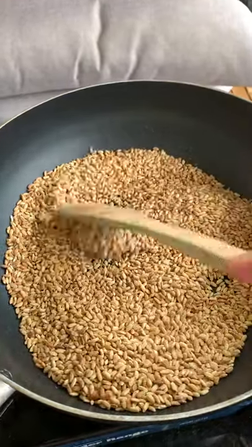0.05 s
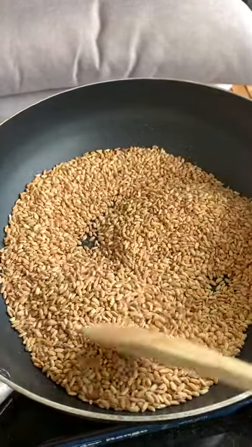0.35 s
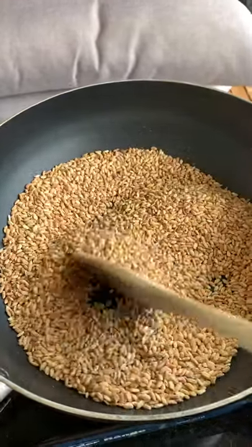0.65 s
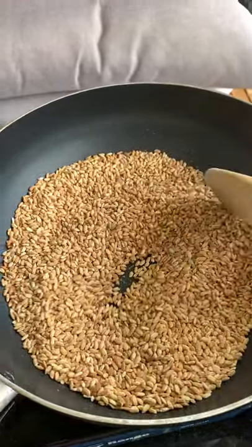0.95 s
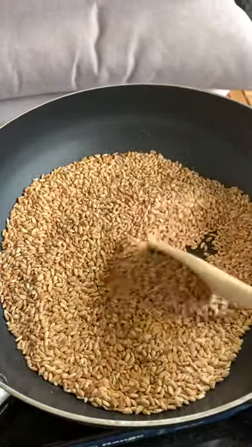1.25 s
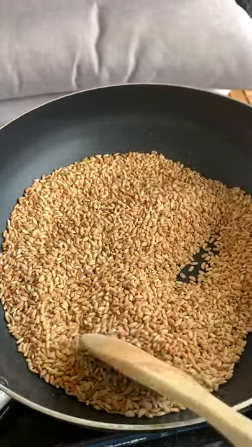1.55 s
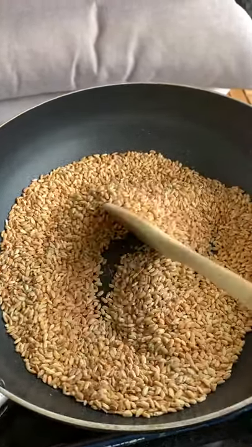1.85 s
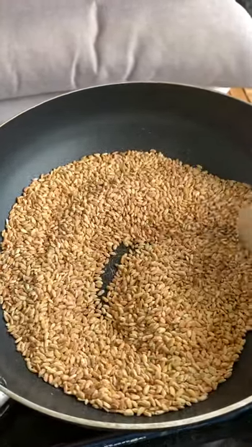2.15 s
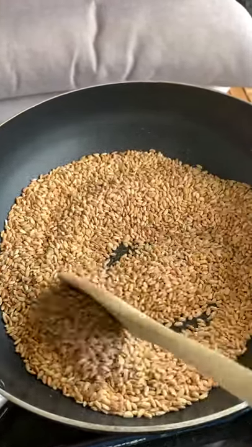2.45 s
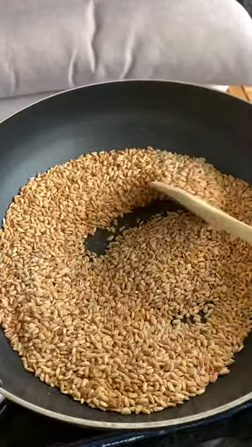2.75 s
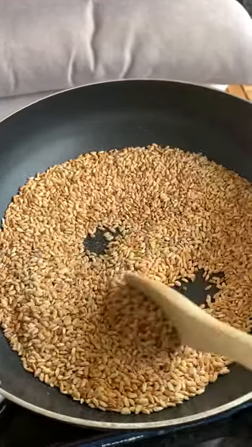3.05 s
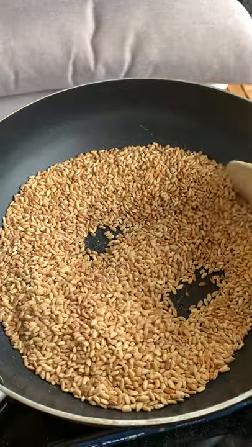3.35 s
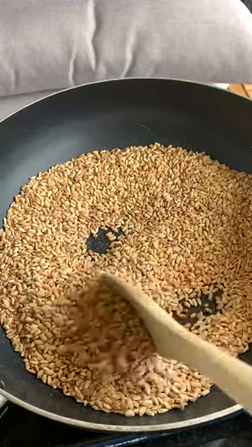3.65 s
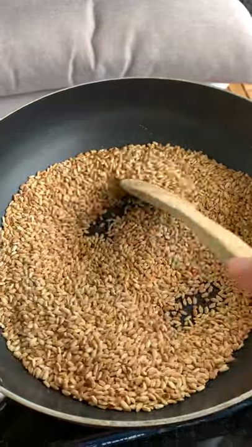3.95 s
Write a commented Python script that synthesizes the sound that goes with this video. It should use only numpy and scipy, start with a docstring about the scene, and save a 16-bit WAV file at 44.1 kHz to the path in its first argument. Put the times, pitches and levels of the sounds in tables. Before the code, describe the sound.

Close up in a kitchen, dry grains swish and crunch under a wooden spatula in a frying pan. The first strokes have brief pauses, then come louder scrapes and small wooden knocks, with a faint rumble underneath.

```python
"""Dry rice, stirred with a wooden spatula in a frying pan, ticks in countless small impacts and
crunches each time the blade digs in. Stick-slip friction makes the blade grind over the bottom with a
shifting resonance; it catches and knocks, and where it lands on bare metal the pan's modes ring.
The pan is heard close up, in stereo, in a kitchen with a low rumble and hum underneath."""
import sys
import numpy as np
from scipy import signal
from scipy.fft import rfft, irfft
from scipy.io import wavfile

SR = 44100
rng = np.random.default_rng(int(sys.argv[2]) if len(sys.argv) > 2 else 0)


def generate_wav(signal):
    """Clip the signal to [-1, 1] and save it as 16-bit WAV at the path in sys.argv[1]."""
    frames = np.transpose(np.atleast_2d(signal))
    scaled = np.clip(frames, -1, 1) * 32767
    pcm = np.round(scaled).astype(np.int16)
    wavfile.write(sys.argv[1], SR, pcm)


N = 176400
T = np.arange(N) / SR
HZ = np.fft.rfftfreq(N, 1 / SR)

# spectrum of the room rumble (frequency [Hz], relative level [dB])
RUMBLE_SPECTRUM = [(15, -6), (32, -10), (52, 3.5), (75, 1.5), (100, -4), (160, -3), (280, 0), (350, -3.5),
                   (430, -8), (570, -8), (850, -14.5), (1400, -17), (2800, -30.5), (16000, -26.5)]
# partials of the hum (frequency [Hz], level [dB])
HUM_PARTIALS = [(58, -48.5), (114, -54), (252, -51.5), (297, -53.5), (352, -53), (555, -56.5)]
# reverberation of the kitchen (frequency [Hz], t60 [s])
ROOM_T60 = [(200, 0.068), (2000, 0.19), (14000, 0.093)]
# phase between the left and right channels, with the treble near 12 kHz held in opposite phase
# (frequency [Hz], lead of the left [rad])
STEREO_PHASE = [(20, 0), (250, -.2), (520, -.7), (800, .3), (1100, .05), (1500, .05), (2200, .6),
                (3000, 2.4), (4200, 2.5), (5000, 3.14), (6500, 4.7), (7800, 6.2), (8900, 6.3), (10300, 7.7),
                (11800, 9.3), (13000, 9.5), (14000, 10.7), (15700, 12.5)]
# likeness of the left and right channels: the stereo spread (frequency [Hz], coherence [0-1])
STEREO_COHERENCE = [(20, .995), (100, .99), (300, .96), (750, .7), (1200, .93), (2000, .87), (2600, .45),
                    (3400, .45), (4200, .85), (5000, .98), (6500, .82), (8300, .98), (10800, .8),
                    (11900, .99), (13000, .99), (14400, .7), (15700, .95)]
# balance of the channels (frequency [Hz], left minus right [dB])
STEREO_BALANCE = [(70, 0), (200, -3.5), (420, -2.5), (680, -10), (1000, -5), (1300, -2.5), (2000, -2.5),
                  (2350, -6), (2900, 0), (3400, -2.5), (4800, 0), (16000, 0)]
# modes of the pan under its load of rice (frequency [Hz], relative level [dB], t60 [s])
PAN_MODES = [(376.5, 0.5, 0.92), (479.5, 5, 0.66), (703, 6, 0.087), (858, -3, 0.66), (918, -2.5, .13),
             (1000, -12, 0.099), (1150, -15, 0.11), (1190, 1.5, 0.057), (1358, -1, 0.14), (1497, 6, 0.15),
             (1556, 5, 0.086), (1773, -7, 0.074), (2120, -5, 0.063), (2450, 1, 0.12)]
# reflections inside the pan (delay [s], gain [dB])
BOWL_ECHOES = [(.00072, -15), (.00114, -13), (.0019, -14), (.0033, -15)]
# the blade lands on bare metal (time [s], level [dB], excitation cutoff [Hz])
LANDINGS = [(.638, -48, 600), (1.592, -35, 450), (3.451, -39.5, 1090)]
# the blade catches and knocks (time [s], peak level [dB], frequency [Hz], decay time [ms])
KNOCKS = [(0.1739, -15.5, 1800, 0.27), (0.1766, -18.5, 1290, .6), (.638, -19.5, 455, 1.3),
          (.652, -29, 380, 5.9), (1.253, -27, 1020, 0.2), (1.3096, -8, 2120, 0.21),
          (1.586, -28, 1250, 0.68), (1.589, -27, 930, 8.7), (1.671, -24, 2030, 1.2), (1.737, -20, 880, 2.4),
          (1.743, -24, 935, 3), (1.87, -14, 800, 1), (1.889, -13, 1290, 1.3), (1.9075, -9, 1000, 1),
          (1.918, -12, 1330, 1.5), (1.9803, -10, 1020, 0.47), (2.023, -18.5, 1000, 0.89),
          (2.448, -10.5, 1380, 1.4), (2.466, -9, 1370, 2.3), (2.497, -6.5, 1310, 1.1),
          (2.591, -19, 700, 2.2), (2.602, -16, 880, 1.5), (2.641, -5, 1870, 1.2), (2.642, -9.5, 712, 2.4),
          (2.645, -19, 1140, 1.2), (2.765, -17.5, 1120, 1.9), (2.8323, -16, 930, 0.84),
          (3.449, -24, 446, 7.9), (3.451, -28, 840, 6), (3.646, -18, 1590, 1.8), (3.671, -22.5, 1170, 1.9),
          (3.717, -20, 2240, 1.2), (3.745, -20, 650, 3.2), (3.7549, -15, 890, 0.7), (3.856, -21, 1750, 1.9),
          (3.944, -20.5, 1220, 2.6), (3.972, -15, 1660, 0.98), (3.987, -17, 1420, 1.8)]
# friction of the blade on the pan bottom (time [s], level [dB])
GRIND_LEVEL = [(0, -48), (.09, -42), (.17, -34.5), (.25, -39.5), (.35, -61), (.46, -68), (.5, -46),
               (.61, -46.5), (.64, -36), (.77, -31), (.87, -44.5), (.98, -59.5), (1.18, -60), (1.29, -39),
               (1.38, -43.5), (1.56, -56.5), (1.66, -41.5), (1.735, -26), (1.81, -29), (1.87, -26),
               (1.895, -26), (1.91, -20.5), (1.935, -22), (1.965, -30.5), (2.03, -39), (2.08, -48),
               (2.29, -48.5), (2.432, -29.5), (2.452, -18), (2.492, -16.5), (2.53, -30.5), (2.61, -22),
               (2.68, -33.5), (2.77, -25), (2.83, -37), (3.01, -44), (3.07, -34), (3.14, -39.5),
               (3.23, -53), (3.42, -57), (3.46, -44), (3.595, -36), (3.645, -27.5), (3.9, -27), (4, -24.5)]
# spectrum of that friction (frequency [Hz], relative level [dB])
GRIND_SPECTRUM = [(100, -29.5), (380, -17), (520, -5), (720, -1.5), (1000, -0.5), (1400, -5.5), (1700, -1),
                  (2050, 0.5), (2600, -4), (3500, -3), (4500, -6.5), (7000, -14.5), (16000, -42)]
# grinding resonance, moving with the blade's angle and grip (time [s], frequency [Hz])
BLADE_RESONANCE = [(.17, 1660), (.64, 910), (.77, 1870), (1.31, 1750), (1.745, 910), (1.84, 1780),
                   (1.875, 940), (1.92, 1200), (1.96, 1430), (2.02, 1000), (2.45, 1230), (2.51, 1350),
                   (2.58, 1920), (2.64, 1930), (2.71, 1370), (2.78, 1340), (3.1, 990), (3.58, 900),
                   (3.62, 1770), (3.65, 1750), (3.68, 1160), (3.76, 1120), (3.87, 1790), (3.945, 1150),
                   (3.98, 1550)]
# rasp of the light strokes (time [s], level [dB])
RASP_LEVEL = [(0, -64), (.17, -32.5), (.34, -62), (.58, -55.5), (.77, -36), (.95, -67), (1.2, -65),
              (1.3, -42), (1.5, -70), (4, -66)]
# single grains snap out from under the blade (time [s], relative level [dB])
SNAPS = [(.082, 0), (0.4735, -3.5), (.4805, -11), (.964, -14.5), (1.0744, -9.5), (1.087, -25), (1.095, -10),
         (1.134, -13.5), (1.203, -18.5), (1.221, -28), (1.249, -13), (1.493, -20), (1.543, -36),
         (1.556, -21), (2.2742, -7.5), (3.3067, -19), (3.322, -28), (3.333, -25), (3.343, -25),
         (3.369, -27), (3.4207, -9), (3.438, -6)]
# amount of rice in motion (time [s], level [dB])
RICE_FLOW = [(0, -27.5), (.127, -23.5), (.347, -36), (.43, -71), (.468, -76), (.5, -38), (.56, -37.5),
             (.666, -27.5), (.841, -32.5), (.98, -40.5), (1.069, -80), (1.085, -30), (1.12, -32),
             (1.22, -38), (1.25, -28.5), (1.354, -32.5), (1.53, -48.5), (1.56, -34), (1.62, -45.5),
             (1.669, -26.5), (1.709, -31.5), (2.06, -34.5), (2.185, -29), (2.367, -24.5), (2.427, -30.5),
             (2.881, -27.5), (2.986, -32), (3.16, -29), (3.265, -58), (3.32, -40), (3.415, -61),
             (3.47, -32), (3.554, -28), (3.629, -29), (3.684, -20.5), (3.744, -27.5), (3.939, -27.5),
             (4, -23.5)]
# the blade digs into the rice (time [s], level [dB], hold [s], decay time [s])
DIGS = [(0.068, -29.5, 0.013, 0.0084), (0.472, -24, 0.009, 0.012), (1.074, -41, .004, 0.0097),
        (1.67, -26.5, 0.0038, 0.015), (2.262, -31, .015, 0.012), (3.424, -22.5, 0.021, 0.0031)]
# spectrum of the grain impacts (frequency [Hz], relative level [dB])
RICE_SPECTRUM = [(100, -40), (500, -7.5), (1800, -15), (2700, -9.5), (3600, -13.5), (4500, -2),
                 (5050, -3.5), (5900, 4.5), (6550, -1.5), (7200, -1), (7800, -2.5), (8550, 3), (9800, -1),
                 (10300, 2.5), (11100, -2), (12400, 5), (13500, -4.5), (15500, -2)]

# contact statistics, as used by contacts()
GRAINS_PER_S, SLIPS_PER_S, REFERENCE_DB = 2200, 900, -30  # the rates hold at this level
GRAIN_TEXTURE = dict(crowding=1.3, spread_db=3, clump_db=2, clump_hz=164)
SLIP_TEXTURE = dict(crowding=.4, spread_db=2, clump_db=1.5, clump_hz=82)


def amp(db):
    """Converts decibels to an amplitude ratio."""
    return 10 ** (np.asarray(db) / 20)


def unit(x):
    """Normalises to an rms of one."""
    return x / np.sqrt(np.mean(x ** 2) + 1e-20)


def curve(points):
    """Interpolates a time table linearly at every sample."""
    return np.interp(T, *np.transpose(points))


def at_hz(points, hz):
    """Interpolates a table on a logarithmic frequency axis."""
    f, value = np.transpose(points)
    return np.interp(np.log(hz + 1), np.log(f + 1), value)


def add(mix, start, sound):
    """Superposes a sound on the mix at a start time in seconds."""
    part = mix[round(start * SR):][:len(sound)]
    part += sound[:len(part)]


def convolve(x, response):
    """Convolves both rows with an impulse response scaled to unit energy."""
    return signal.oaconvolve(x, response[None] / np.linalg.norm(response), axes=1)[:, :N]


def colour(x, spectrum, size=2048):
    """Minimum-phase filtering imposes a spectral shape causally."""
    log_gain = np.log(amp(at_hz(spectrum, abs(np.fft.fftfreq(size, 1 / SR)))))
    transfer = np.exp(np.conj(signal.hilbert(log_gain)))
    return convolve(x, np.fft.ifft(transfer).real[:size // 2])


def resonate(x, hz, width_hz):
    """Forced response of a damped resonator whose frequency follows the curve hz."""
    turn = np.exp(2j * np.pi * np.cumsum(hz) / SR)
    pole = np.exp(-np.pi * width_hz / SR)
    return (turn * signal.lfilter([np.sqrt(2 * (1 - pole * pole))], [1, -pole], x / turn)).real


def wander(low_hz, high_hz):
    """Band-pass noise of unit rms serves as random modulation."""
    white = rfft(rng.standard_normal(N))
    return unit(irfft(white * HZ / (HZ + low_hz) / (1 + (HZ / high_hz) ** 2), N))


def contacts(level_db, per_s, crowding, spread_db, clump_db, clump_hz):
    """Shot noise: two rows of clumped impulses, their rate growing as amplitude ** crowding."""
    chance = np.minimum(per_s * amp(crowding * (level_db - REFERENCE_DB)) / SR, 1)
    strength = amp(spread_db * np.minimum(rng.exponential(1, N), 3.5))
    strength *= amp(clump_db * wander(9.4, clump_hz))
    impulses = (rng.random(N) < chance) * rng.choice([-1, 1], (2, N))
    return unit(impulses * strength / np.sqrt(chance)) * amp(level_db)


def background(rumble_db=-40.5, waver_rad=0.66):
    """Filtered noise gives a low rumble; phase modulation makes the hum's partials waver."""
    hum = sum(amp(db) * np.sqrt(2) * np.sin(2 * np.pi * hz * T + waver_rad * wander(0.18, 2.1))
              for hz, db in HUM_PARTIALS)
    rumble = unit(colour(rng.standard_normal((2, N)), RUMBLE_SPECTRUM, size=8192))
    return amp(rumble_db) * rumble + np.outer([1, 0], hum)


def kitchen(x, gain_db=-9, gap_s=.005):
    """Reverberation: a short diffuse tail decays exponentially, at its own rate in each band."""
    hz, t, bands = signal.stft(rng.standard_normal(SR // 2), SR, nperseg=256)
    decay = amp(-60 * t / at_hz(ROOM_T60, hz)[:, None])
    tail = signal.istft(bands * decay, SR, nperseg=256)[1]
    return amp(gain_db) * convolve(x, tail * (T[:len(tail)] > gap_s))


def stereo_spread(x):
    """Partial coherence: left is the sum of the two rows, right their phase-shifted difference."""
    coherence = np.clip(at_hz(STEREO_COHERENCE, HZ), 0, 1)
    shared, opposed = rfft(x) * np.sqrt([(1 + coherence) / 2, (1 - coherence) / 2])
    balance = amp(at_hz(STEREO_BALANCE, HZ))
    left = (shared + opposed) * balance
    right = (shared - opposed) * np.exp(-1j * at_hz(STEREO_PHASE, HZ))
    return irfft(np.array([left, right]) * np.sqrt(2 / (1 + balance ** 2)), N)


def bowl(x):
    """Comb filtering: early reflections from the pan wall interfere with the direct sound."""
    comb = 1 + sum(amp(db) * np.exp(-2j * np.pi * HZ * delay) for delay, db in BOWL_ECHOES)
    return irfft(rfft(x) * comb / np.sqrt(np.mean(abs(comb) ** 2)), N)


def pan(x, ring_db=-22.5):
    """Forced vibration: the pan passes on the blade's pushes, and its modes ring after them."""
    t = T[:SR // 4]
    ring = sum(amp(db - 60 * t / t60) * np.cos(2 * np.pi * hz * t) for hz, db, t60 in PAN_MODES)
    return x + amp(ring_db) * convolve(x, ring)


def landings(chatter_rad=.6, chatter_hz=45):
    """Free vibration: soft wood excites the pan's lower modes; chattering grains roughen the ring."""
    out, t = np.zeros((2, N)), T[:SR // 2]
    for hz, db, t60 in PAN_MODES:
        jitter = chatter_rad * wander(10, chatter_hz)[:len(t)]
        mode = amp(db - 60 * t / t60) * np.sin(2 * np.pi * hz * t + jitter)
        for start, level_db, cutoff_hz in LANDINGS:
            add(out[0], start, amp(level_db) * mode / (1 + (hz / cutoff_hz) ** 6))
    return out


def knocks(rise_s=0.0005, rattle_db=-22, rattle_s=0.013, size=2048):
    """Impacts of wood on the pan are heavily damped oscillations; trapped grains rattle after each."""
    out, t = np.zeros((2, N)), T[:size]
    for start, db, hz, decay_ms in KNOCKS:
        envelope = (1 - np.exp(-t / rise_s)) * np.exp(-t * 1000 / decay_ms)
        blow = np.sin(2 * np.pi * hz * t) * envelope
        add(out[0], start, amp(db) * blow / abs(blow).max())
        burst = rng.standard_normal((2, size)) * np.exp(-t / rattle_s)
        for row, rattle in zip(out, convolve(burst, blow)):
            add(row, start, amp(db + rattle_db) * rattle)
    return out


def grinding(friction_db=-3.5, resonance_db=-11.5, width_hz=460, wobble=0.2):
    """Stick-slip friction: the blade jerks over trapped grains, exciting its shifting resonance."""
    slips = contacts(curve(GRIND_LEVEL), SLIPS_PER_S, **SLIP_TEXTURE)
    friction = colour(slips, GRIND_SPECTRUM)
    pitch = curve(BLADE_RESONANCE) * np.exp(wobble * wander(8.9, 59))
    resonance = unit(resonate(friction, pitch, width_hz)) * friction.std()
    return amp(friction_db) * friction + amp(resonance_db) * resonance


def rasping(centre_hz=3150, width_hz=1600):
    """Sliding friction of grains along the blade gives a coarse band of upper-mid noise."""
    slips = contacts(curve(RASP_LEVEL), SLIPS_PER_S * 2, **SLIP_TEXTURE)
    pitch = np.full(N, centre_hz)
    band = resonate(slips, pitch, width_hz)
    return unit(resonate(band, pitch, width_hz)) * slips.std()


def snaps(decay_s=0.00064, size=512):
    """Elastic release: a pinched grain springs free with a tiny bright crack."""
    out = np.zeros((2, N))
    for start, db in SNAPS:
        crack = rng.standard_normal(size) * np.exp(-T[:size] / decay_s)
        add(out[0], start, amp(db) * crack / abs(crack).max())
    return colour(out, RICE_SPECTRUM)


def rice_level():
    """Incoherent sources add in power: the flow plus the crunch of each dig, in decibels."""
    power = amp(curve(RICE_FLOW)) ** 2
    for start, db, hold, decay in DIGS:
        crunch = amp(db) * (T >= start) * np.exp(-np.maximum(T - start - hold, 0) / decay)
        power += crunch ** 2
    return 10 * np.log10(power)


def rice(kinds=12, click=0.48, wall_db=4.5, wall_s=0.0092, drift_db=0.6, drift_s=.04, gain_db=1):
    """Granular collisions: each impact is a short, damped high tick that echoes off the pan wall."""
    impacts = contacts(rice_level(), GRAINS_PER_S, **GRAIN_TEXTURE)
    kind = rng.integers(0, kinds, N)
    out, t, tick_power = np.zeros((2, N)), T[:384], 0
    for k, hz in enumerate(np.linspace(3500, 15500, kinds)):
        tick = np.cos(2 * np.pi * hz * t) * np.exp(-t * hz) + click * (t == 0)
        echoes = rng.standard_normal(len(t)) * np.exp(-t / wall_s)
        tick += amp(wall_db) * np.convolve(tick, echoes / np.linalg.norm(echoes))[:len(t)]
        drift = np.interp(T / drift_s, np.arange(len(t)), rng.standard_normal(len(t)))
        out += convolve(impacts * (kind == k) * amp(drift_db * drift), tick)
        tick_power += abs(rfft(tick / np.linalg.norm(tick))) ** 2 / kinds
    # flatten the ticks' mean spectrum, so that RICE_SPECTRUM sets the timbre
    mean_power = np.interp(HZ, np.fft.rfftfreq(len(t), 1 / SR), tick_power)
    whitened = irfft(rfft(out) / np.sqrt(mean_power), N)
    return amp(gain_db) * colour(whitened, RICE_SPECTRUM)


def scene():
    """Superposition of rice, blade, pan, reverberation and background, spread in stereo."""
    grains = bowl(rice() + snaps() + rasping())
    stirring = grains + pan(grinding() + knocks()) + landings()
    return stereo_spread(stirring + kitchen(stirring) + background())


def record(dry):
    """Band limiting: a linear-phase low-pass filter removes the highest treble."""
    cutoff_hz = 15800
    lowpass = signal.firwin(511, cutoff_hz, window=("kaiser", 9), fs=SR)
    return signal.oaconvolve(dry, lowpass[None], "same")


dry = scene()
out = record(dry)
generate_wav(out)
```